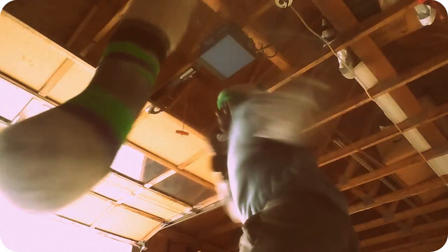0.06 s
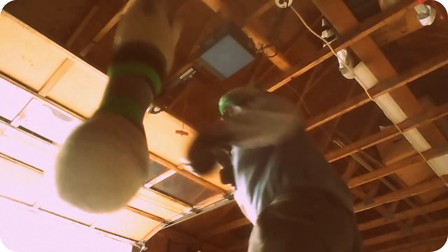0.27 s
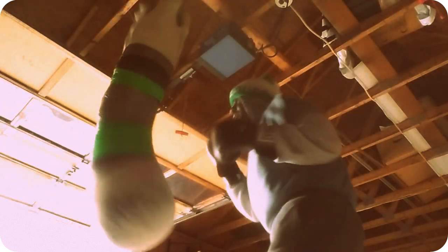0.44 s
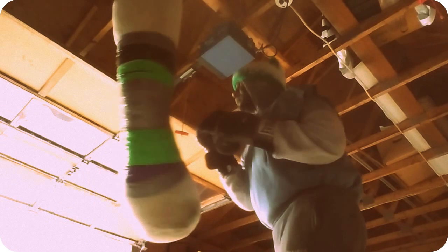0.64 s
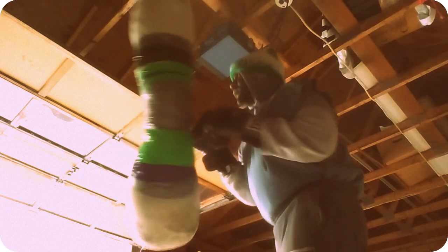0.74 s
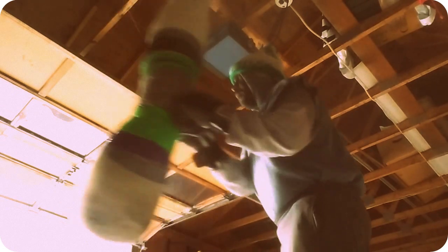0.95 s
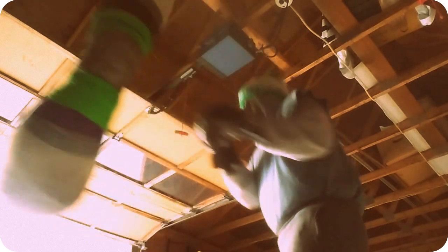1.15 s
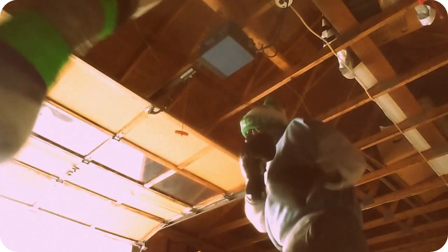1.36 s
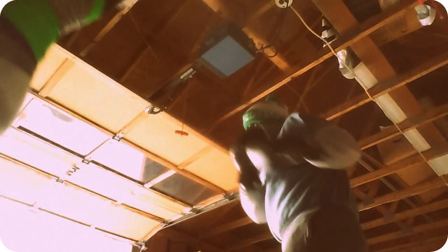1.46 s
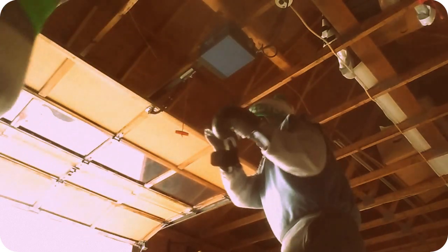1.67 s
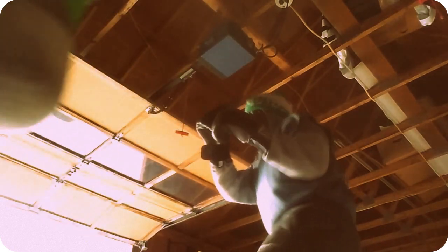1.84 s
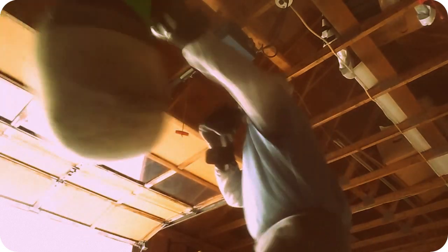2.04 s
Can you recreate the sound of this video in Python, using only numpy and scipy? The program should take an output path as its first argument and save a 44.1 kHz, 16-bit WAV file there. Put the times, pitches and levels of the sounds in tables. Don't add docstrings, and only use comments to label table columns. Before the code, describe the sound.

Over the fading tail of an earlier blow, a sole scuffs and a glove slams into a heavy bag. The boom dies in a bare, echoing garage, leaving soft footfalls, filling groans and thin chain clinks, heard from floor level.

```python
import sys
import numpy as np
from scipy import signal
from scipy.fft import rfft, irfft
from scipy.io import wavfile

SR = 44100
rng = np.random.default_rng(int(sys.argv[2]) if len(sys.argv) > 2 else 0)


def voltage_ratio(decibels):
    exponent = np.asarray(decibels, float) / 20
    return 10 ** exponent


def generate_wav(sig):
    pcm = np.round(np.clip(np.atleast_2d(sig).T, -1, 1) * 32767).astype(np.int16)
    wavfile.write(sys.argv[1], SR, pcm)


N = 92610
LEAD = 22050


def clock():
    return (np.arange(N + LEAD) - LEAD) / SR


def at_hz(points, hz):
    table_hz, values = np.array(points).T
    return np.interp(np.log(hz), np.log(table_hz), values)


def rms_one(x):
    return x / np.sqrt(np.mean(x ** 2) + 1e-20)


def drift(rate_hz):
    r = np.exp(-2 * np.pi * rate_hz / SR)
    white = rng.standard_normal(N + 2 * LEAD)
    return rms_one(signal.lfilter([1], [1, -2 * r, r * r], white)[LEAD:])


def coloured(spectrum):
    hz = np.fft.rfftfreq(N + LEAD, 1 / SR) + 1
    low_cut = np.minimum(hz / spectrum[0][0], 1) ** 3
    high_cut = np.minimum(spectrum[-1][0] / hz, 1) ** 2
    white = rfft(rng.standard_normal(N + LEAD))
    return rms_one(irfft(white * voltage_ratio(at_hz(spectrum, hz)) * low_cut * high_cut, N + LEAD))


def bands(spectrum, patchy_db):
    edges = 33 * 2 ** np.arange(0, 9.4, .5)
    white = rng.standard_normal((2, N + LEAD))
    out = []
    for k, (low, high) in enumerate(zip(edges, edges[1:])):
        hz = np.sqrt(low * high)
        band_pass = signal.butter(2, [low, high], "band", fs=SR, output="sos")
        level_db = at_hz(spectrum, hz) + patchy_db * drift(42)
        out.append((hz, signal.sosfilt(band_pass, white[k % 2]) * voltage_ratio(level_db)))
    total = np.std(sum(band for _, band in out))
    return [(hz, band / total) for hz, band in out]


def dying(s, t60, rise):
    t = np.maximum(clock() - s, 0)
    return (1 - np.exp(-t / rise)) * voltage_ratio(-60 * t / t60)


def held(t, length, rise, fall):
    return np.clip(t / rise, 0, 1) ** 2 * voltage_ratio(-60 * np.maximum(t - length, 0) / fall)


def ring(x, hz, t60):
    r, w = voltage_ratio(-60 / (t60 * SR)), 2 * np.pi * hz / SR
    return signal.lfilter([0, np.sin(w)], [1, -2 * r * np.cos(w), r * r], x + 1e-18)


def burst(s, length, hz, width_hz, rise, fall, count=1):
    first = max(int(s * SR) + LEAD - 2000, 0)
    noise = rng.standard_normal(20000)[:N + LEAD - first]
    t = (first - LEAD + np.arange(len(noise))) / SR - s
    shape = held(t, length, rise, fall)
    r, w = np.exp(-np.pi * width_hz / SR), 2 * np.pi * hz / SR
    for _ in range(count):
        noise = signal.lfilter([1, 0, -1], [1, -2 * r * np.cos(w), r * r], noise)
    sound = shape * noise
    out = np.zeros(N + LEAD)
    out[first:first + len(noise)] = sound * np.sqrt(np.sum(shape ** 2) / (np.sum(sound ** 2) + 1e-20))
    return out


# (frequency [Hz], level [dB per Hz])
AIR_COLOUR = [(30, -21.5), (90, 3), (486, 3), (1000, -1), (2540, -17), (6300, -14.5), (7800, -32.5),
              (16000, -31)]


def still_air():
    return voltage_ratio(-53) * sum(band for _, band in bands(AIR_COLOUR, patchy_db=2.0))


# (time [s], level [dB])
SWAY_LEVEL = [(0.8, -57), (1.021, -59), (1.302, -62.5), (1.618, -55.5), (1.798, -62.5), (2.1, -100)]
# (frequency [Hz], level [dB per Hz])
RUSTLE_COLOUR = [(900, -14), (1500, 8), (2500, -0.5), (6400, 3), (8500, -17.5), (16000, -14)]


def rustle():
    sway_db = np.interp(clock(), *np.transpose(SWAY_LEVEL))
    cloth = sum(band for hz, band in bands(RUSTLE_COLOUR, patchy_db=2.0) if hz > 1200)
    return voltage_ratio(sway_db + 3.0) * cloth


# (time [s], length [s], level [dB], centre [Hz])
CLOTH_SWISHES = [(0.419, 0.025, -42, 14400), (0.556, 0.012, -52.5, 13000), (0.562, 0.01, -40, 6070),
                 (.608, 0.11, -42.5, 5850), (0.612, 0.018, -54, 14000), (0.849, 0.067, -52.5, 6000),
                 (0.854, 0.093, -60, 14000), (1.235, 0.026, -59, 9200), (1.509, 0.054, -51.5, 6100),
                 (1.49, 0.12, -73, 12000), (1.64, 0.059, -54.5, 4300)]


def swishes():
    return sum(voltage_ratio(db) * burst(s, length, hz, .35 * hz, rise=.001, fall=.12)
               for s, length, db, hz in CLOTH_SWISHES)


# (time [s], level [dB], centre [Hz], dull part [dB])
GRIT_TICKS = [(0.075, -49.5, 5930, -43), (.119, -52, 4000, -63), (.5203, -48, 2500, -38),
              (.608, -46, 12500, -53), (.851, -59, 6060, -48), (0.8622, -39, 6000, -38),
              (1.6158, -39, 7000, -35), (1.5275, -39, 6000, -40), (.867, -57, 6000, -48),
              (0.95, -43, 6030, -32.5), (1.174, -48.5, 5000, -50), (1.218, -51, 14300, -54.5),
              (1.351, -69, 3420, -76), (1.535, -49, 5970, -56), (1.622, -46, 5540, -53),
              (1.632, -36, 4100, -51), (1.686, -44, 5260, -52), (1.9286, -48.5, 5800, -64),
              (2.0857, -39.5, 3650, -35), (2.091, -44, 5900, -42)]


def ticks():
    snaps = np.zeros(N + LEAD)
    places = [int(s * SR) + LEAD for s, *_ in GRIT_TICKS]
    signs = rng.choice([-1, 1], len(GRIT_TICKS))
    snaps[places] = [voltage_ratio(dull_db + 4.0) for *_, dull_db in GRIT_TICKS] * signs
    cracks = sum(voltage_ratio(db) * burst(s, .0013, hz, .75 * hz, rise=.00038, fall=.022)
                 for s, db, hz, _ in GRIT_TICKS)
    return cracks + ring(snaps, hz=700, t60=.008)


# (time [s], length [s], level [dB], ring [Hz])
FILLING_GROANS = [(0.36, 0.019, -53, 690), (1.835, 0.024, -59, 1515), (1.84, 0.045, -55.5, 1163),
                  (1.76, .04, -54, 190), (1.435, 0.053, -51.5, 515), (1.44, 0.086, -54, 1310),
                  (.95, 0.046, -52, 1400), (1.535, 0.02, -48.5, 810), (1.1, 0.011, -50.5, 980),
                  (1.529, 0.025, -53, 366), (1.59, 0.011, -48, 993), (1.612, 0.0068, -47, 458),
                  (1.625, 0.0064, -47.5, 308)]


def groans():
    return sum(voltage_ratio(db) * burst(s, length, hz, 85, rise=.0025, fall=.093, count=2)
               for s, length, db, hz in FILLING_GROANS)


# (time [s], length [s], level [dB], ring [Hz])
CHAIN_CLINKS = [(-.02, .1, -64, 13200), (0.027, 0.04, -69.5, 10100), (0.271, 0.05, -38, 12720),
                (0.328, 0.022, -45.5, 12500), (0.405, 0.018, -55, 12900), (0.53, 0.026, -54, 14800),
                (0.639, 0.018, -47, 13100), (0.643, 0.036, -49, 14920), (0.666, 0.02, -44, 12930),
                (0.702, .02, -58, 14800), (0.717, 0.017, -57, 10200), (0.736, 0.058, -59, 13040),
                (1.098, 0.0055, -54, 7440), (1.11, 0.03, -62.5, 13250), (1.213, 0.027, -63, 12900),
                (1.216, 0.023, -76, 10300), (1.322, 0.013, -52.5, 13000), (1.323, 0.0065, -56, 3900),
                (1.326, 0.016, -62.5, 6430), (1.31, 0.02, -68, 10000), (1.393, 0.027, -75, 12880),
                (1.515, 0.018, -48, 13100), (1.519, 0.028, -58, 14800), (1.558, 0.048, -58, 12940),
                (1.72, .035, -65, 12970), (1.77, 0.029, -75.5, 12980)]


def chain():
    links = sum(voltage_ratio(db) * burst(s, length, hz, 90, rise=.0052, fall=.07, count=2)
                for s, length, db, hz in CHAIN_CLINKS)
    jolt = voltage_ratio(-20.5) * burst(.2625, .003, 12900, 300, rise=.001, fall=.015)
    return links + jolt


# (time [s],
# length [s], level [dB], centre [Hz])
FOOTFALLS = [(-.02, 0.028, -48.5, 800), (.62, 0.068, -45, 239), (0.842, 0.06, -52, 516),
             (0.946, 0.015, -47, 204), (.948, 0.026, -43.5, 604), (0.955, 0.029, -53.5, 1090),
             (1.27, 0.056, -53, 550), (1.534, 0.027, -54, 770), (1.772, 0.031, -59, 214),
             (1.826, 0.045, -59.5, 1380), (2.049, 0.056, -53.5, 490)]


def footfalls():
    tread = sum(voltage_ratio(db) * burst(s, length, hz, .45 * hz, rise=.0014, fall=.52)
                for s, length, db, hz in FOOTFALLS)
    return tread * voltage_ratio(2.25 * drift(66))


# (time [s], length [s], level [dB], level change over the length [dB])
SOLE_SCUFFS = [
    (0.177, 0.0064, -54, 27.5),
    (0.187, 0.14, -30, -10.5),
    (0.6695, 0.016, -27.5, -2.5),
    (1.532, 0.054, -46.5, -11),
    (2.046, 0.034, -60.5, 6.5),
]
# (frequency [Hz], level [dB per Hz])
SCUFF_COLOUR = [(300, -4), (1300, -8.5), (2500, -0.5), (3600, 0), (4370, -1), (6500, -4), (9000, -14.5),
                (16000, -24)]
# (time [s], level [dB], ring [Hz])
SOLE_GRIT = [(.1872, -27, 2700), (.1893, -22, 3500), (.1915, -29, 7000), (.1965, -28, 5000),
             (.199, -25, 3800), (.2025, -25, 2700), (.2045, -25, 3900), (.209, -30, 3300),
             (.218, -29, 3700), (.2235, -25, 2600), (.2255, -29, 4100), (.6715, -30, 2500),
             (.678, -31, 4500), (.682, -32, 4000)]


def scuffs():
    t, scrape = clock(), 0
    for s, length, db, change_db in SOLE_SCUFFS:
        level = voltage_ratio(db + change_db * np.clip((t - s) / length, 0, 1))
        scrape = scrape + level * held(t - s, length, rise=.002, fall=.035)
    roughness = voltage_ratio(2.0 * drift(120))
    grit = sum(voltage_ratio(db) * burst(s - .001, .002, hz, 1100, rise=.001, fall=.0045, count=2)
               for s, db, hz in SOLE_GRIT)
    return grit + scrape * coloured(SCUFF_COLOUR) * roughness


# (frequency [Hz], t60 [s])
GARAGE_DECAY = [(60, 0.7), (250, 1), (700, 0.7), (2000, 0.77), (5000, 0.61), (12000, 0.55)]


def garage(x):
    t = np.arange(N + LEAD) / SR
    flat = bands([(30, 0), (16000, 0)], patchy_db=0)
    echo = sum(band * voltage_ratio(-60 * t / at_hz(GARAGE_DECAY, hz)) for hz, band in flat)
    echo = echo * (t > .004)
    return voltage_ratio(-10.5) * signal.fftconvolve(x, echo / np.sqrt(np.sum(echo ** 2)))[:N + LEAD]


# (time [s], level [dB])
PUNCHES = [
    (-.42, -3),
    (.2483, 0),
]
# (frequency [Hz], level [dB per Hz])
BOOM_COLOUR = [(45, -20), (150, -17), (240, -19.5), (330, -20.5), (520, -4), (965, -8), (3200, -18),
               (6300, -11), (10000, -30), (16000, -26.5)]


def boom():
    out = 0
    for hz, band in bands(BOOM_COLOUR, patchy_db=.5):
        t60, rise = at_hz(GARAGE_DECAY, hz), .0013 + 6.2 / hz
        out = out + band * sum(voltage_ratio(db) * dying(s + .011, t60, rise) for s, db in PUNCHES)
    return voltage_ratio(-12) * out


def roof():
    swell_s = .088
    return voltage_ratio(-22.5) * sum(voltage_ratio(db) * burst(s, swell_s, 241.5, 30, rise=swell_s, fall=.78)
                            for s, db in PUNCHES)


SINK_LAG_S = .0148

# (frequency [Hz], width [Hz], level [dB], t60 [s])
BAG_BODY = [(53, 12, -16.5, .86), (224, 33, -9, .9), (422, 20, -4, 0.84), (510.3, 40, 4.5, 0.85),
            (561, 64, 1.5, 0.73), (718, 51, -12.5, 0.38), (977, 31, -4, 0.34), (1482, 69, -0.5, 0.5),
            (1767, 45, -7, .85), (2406, 90, -11.5, 0.97)]


def thud():
    white = rng.standard_normal(N + LEAD)
    shaken = []
    for hz, width_hz, level_db, t60 in BAG_BODY:
        mode = rms_one(ring(white, hz, 2.4 / np.clip(width_hz, 15, 200)))
        shaken.append((voltage_ratio(level_db) * mode, t60))
    total = np.std(sum(mode for mode, _ in shaken))
    out = 0
    for s, db in PUNCHES:
        first = voltage_ratio(-13.0) * dying(s + PUSH_S, .1, .0009)
        for mode, t60 in shaken:
            second = voltage_ratio(-2) * dying(s + SINK_LAG_S, t60, .0073)
            out = out + voltage_ratio(db) * mode * (first + second)
    return voltage_ratio(-10) / total * out


# (frequency [Hz], level [dB], t60 [s])
COVER_RINGS = [(440, -9, .09), (540, -10, .09), (710, -11, .1), (1000, -22, .06), (1270, -22, .05)]


def knock():
    clicks = sum(voltage_ratio(db) * (np.abs(clock() - s) < .5 / SR) for s, db in PUNCHES)
    return sum(voltage_ratio(level_db) * ring(clicks, hz, t60) for hz, level_db, t60 in COVER_RINGS)


# (frequency [Hz], level [dB per Hz])
SLAP_COLOUR = [(120, -14.5), (200, -17), (671, -1), (2330, 0), (4120, 4), (5330, 0.5), (6760, 4),
               (10000, -7), (16000, -10)]


def slap():
    t, shape = clock(), 0
    for s, db in PUNCHES:
        direct = voltage_ratio(-11) * held(t - (s + .62 * PUSH_S), .0088, rise=.00016, fall=.010)
        wall = voltage_ratio(-15) * held(t - (s + .019), .004, rise=.00034, fall=.076)
        shape = shape + voltage_ratio(db) * (direct + wall)
    return shape * coloured(SLAP_COLOUR)


PUSH_S = .0008


def push():
    t, out = clock(), 0

    def bump(start, width):
        return np.sin(np.pi * np.clip((t - start) / width, 0, 1)) ** 2

    for s, db in PUNCHES:
        shove = bump(s, PUSH_S) - .6 * bump(s + .8 * PUSH_S, 1.6 * PUSH_S)
        deep = s + SINK_LAG_S
        sink = bump(deep + .002, .0013) - bump(deep, .0016)
        sink = sink - bump(deep + .0030, .0010) + bump(deep + .0038, .0010)
        out = out + voltage_ratio(db) * (voltage_ratio(-9) * shove + voltage_ratio(-4) * sink)
    return out


def blows():
    return boom() + roof() + thud() + knock() + slap() + push()


def scene():
    small = swishes() + ticks() + groans() + chain() + footfalls() + scuffs()
    mix = still_air() + rustle() + small + garage(small) + blows()
    return mix[None, LEAD:]


def band_limit(x):
    return signal.sosfilt(signal.butter(12, 16820, fs=SR, output="sos"), x)


def record(dry):
    low_cut = signal.butter(6, 42, "high", fs=SR, output="sos")
    top_cut = signal.cheby2(14, 50, 16250, fs=SR, output="sos")
    ceiling = 1.1
    x = signal.sosfilt(low_cut, dry)
    x = ceiling * np.tanh(x / ceiling)
    return band_limit(signal.sosfilt(top_cut, x))


dry = scene()
out = record(dry)
generate_wav(out)
```